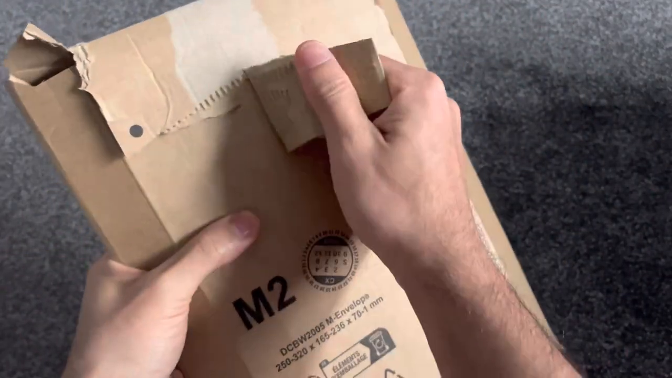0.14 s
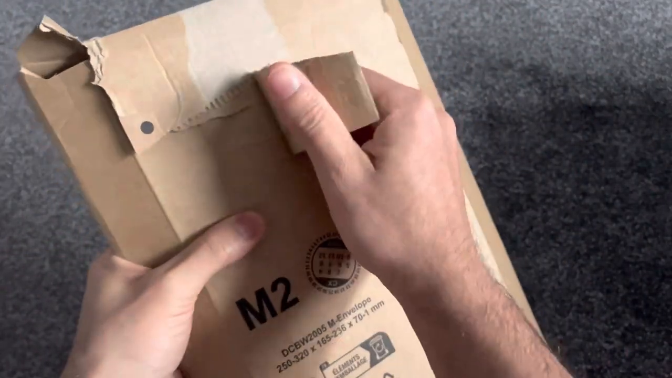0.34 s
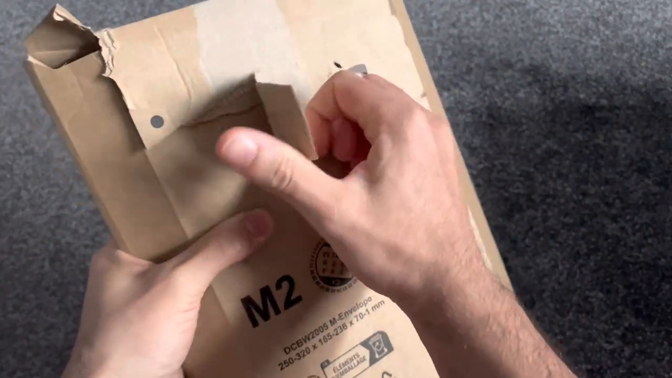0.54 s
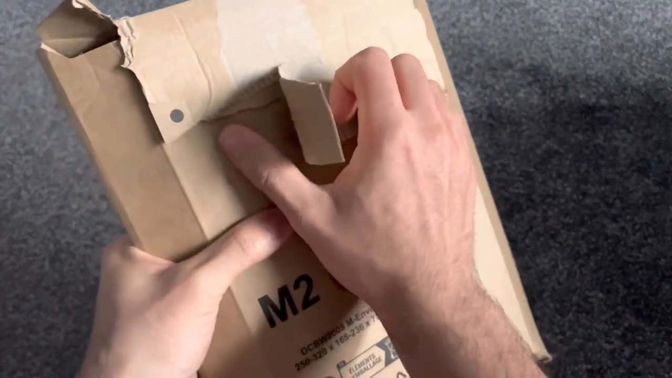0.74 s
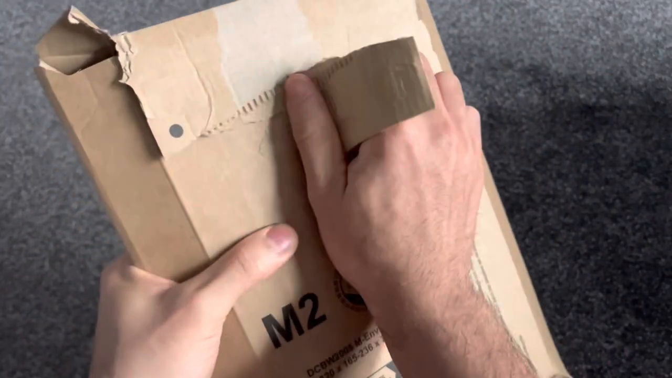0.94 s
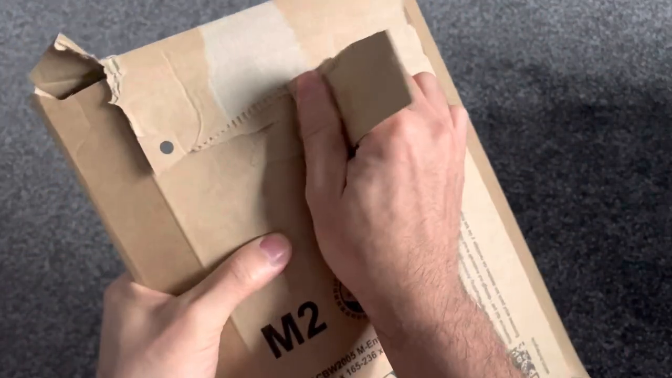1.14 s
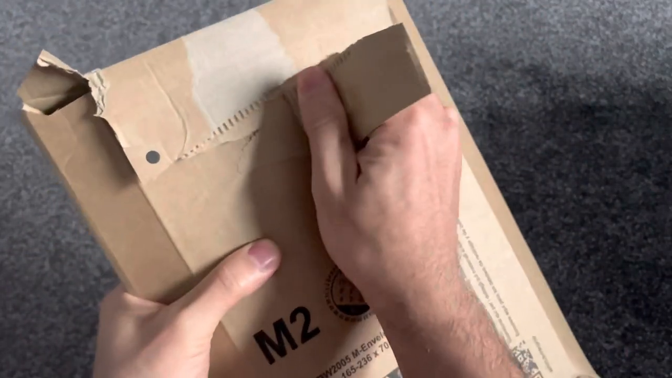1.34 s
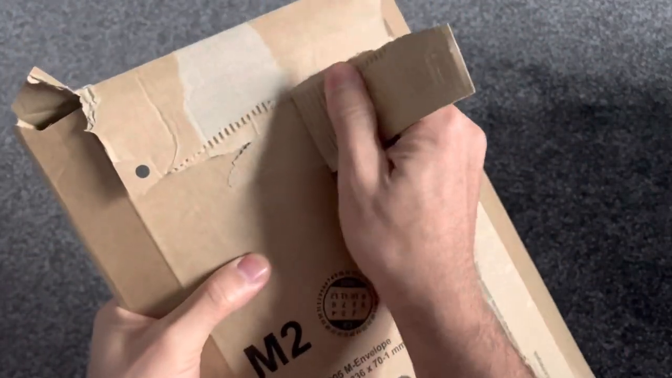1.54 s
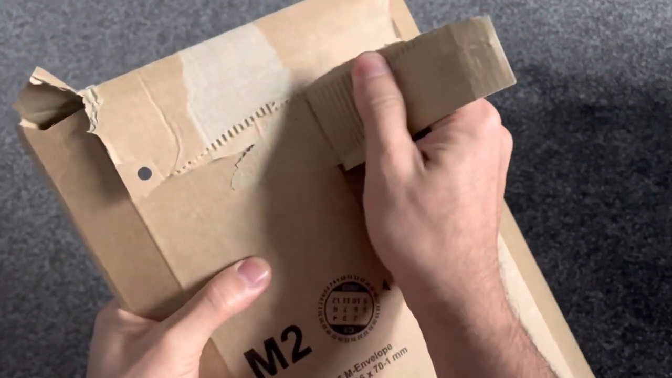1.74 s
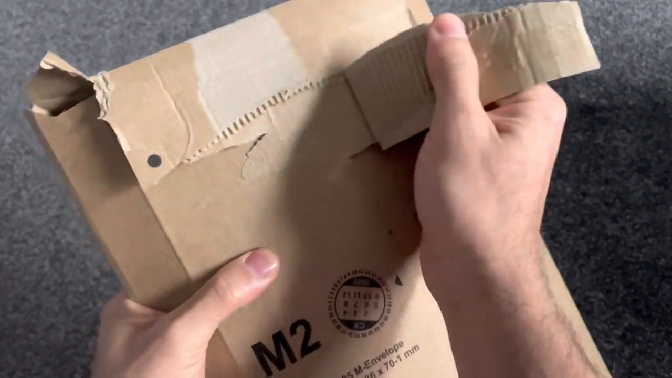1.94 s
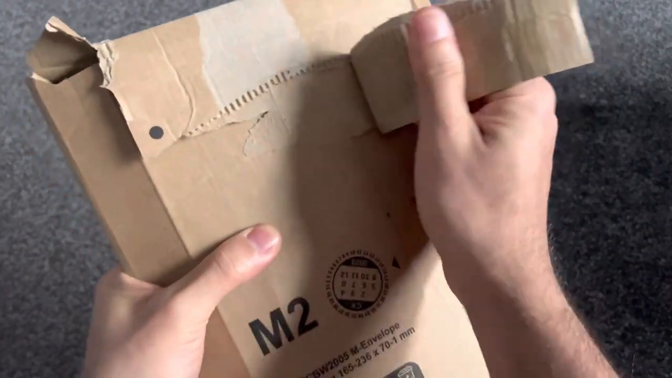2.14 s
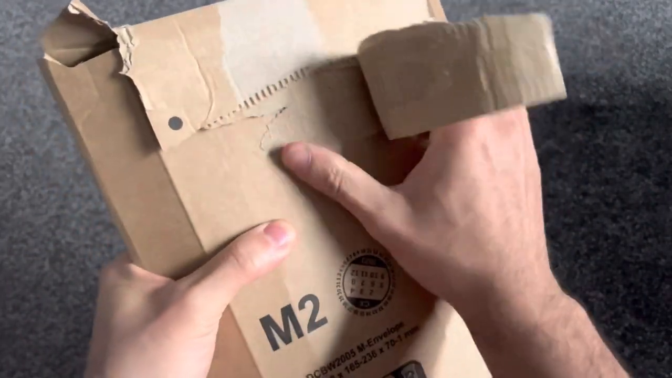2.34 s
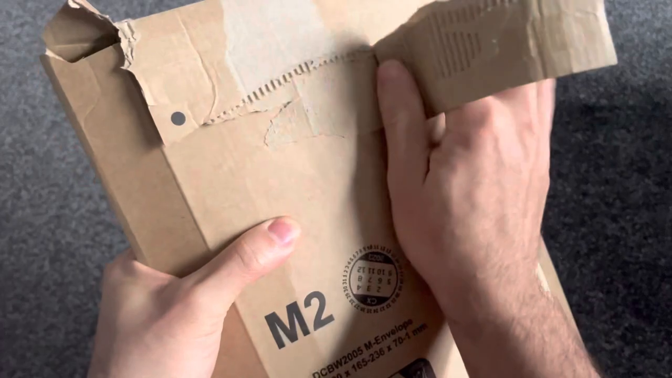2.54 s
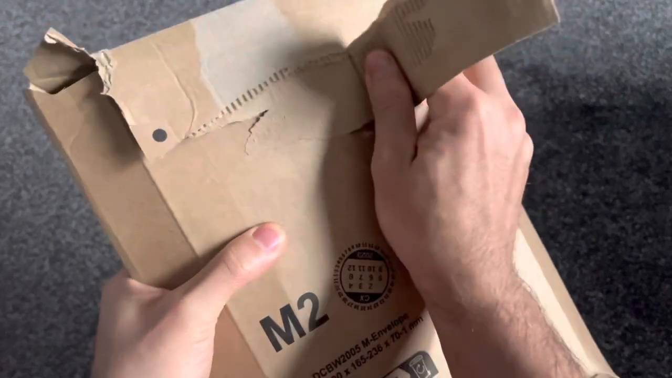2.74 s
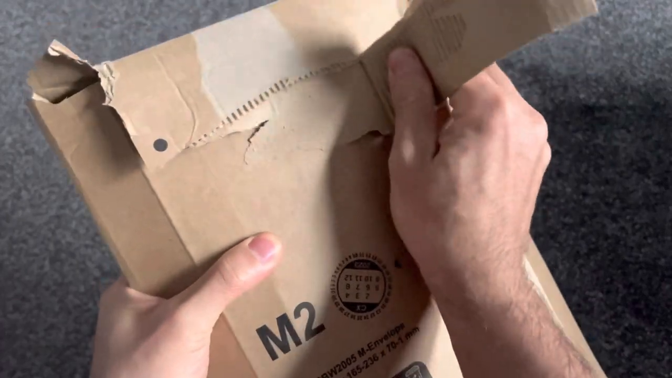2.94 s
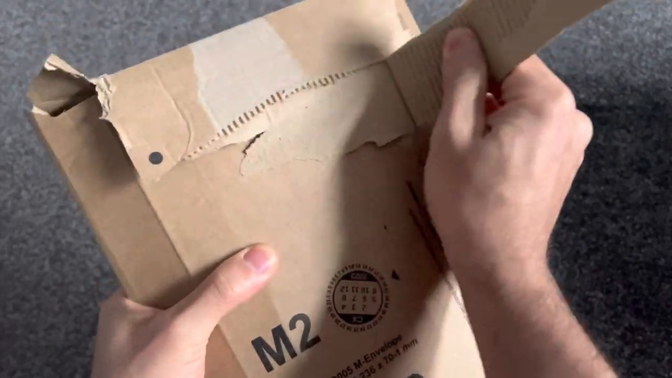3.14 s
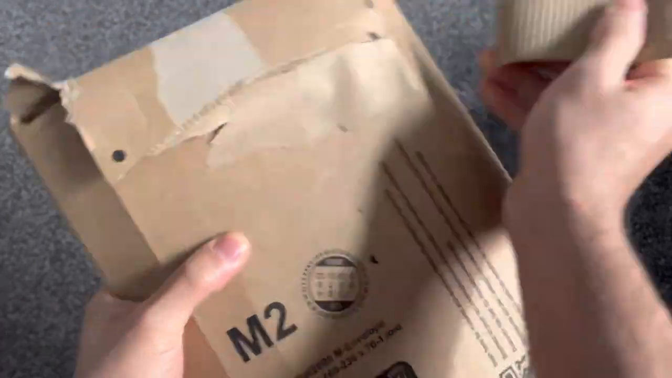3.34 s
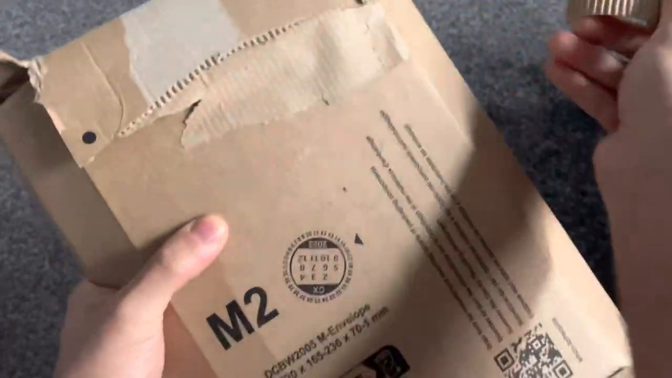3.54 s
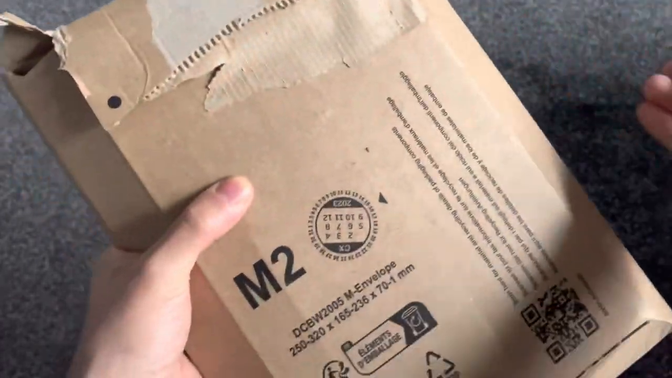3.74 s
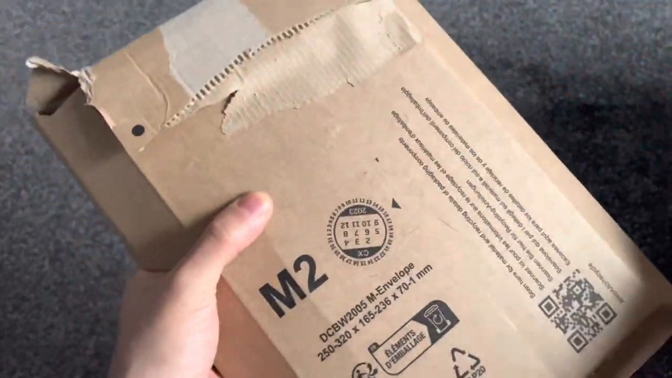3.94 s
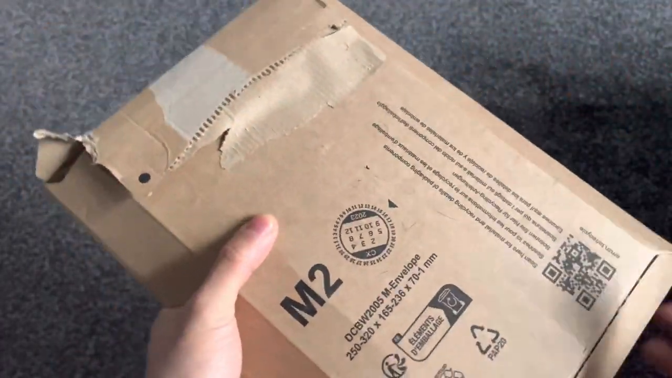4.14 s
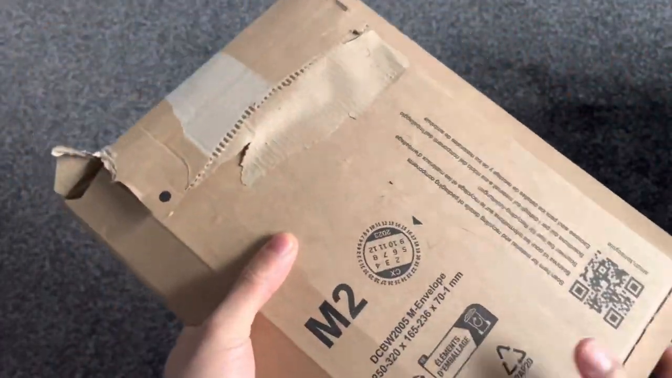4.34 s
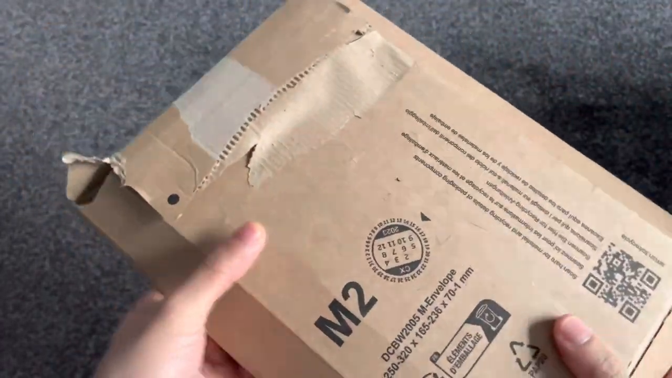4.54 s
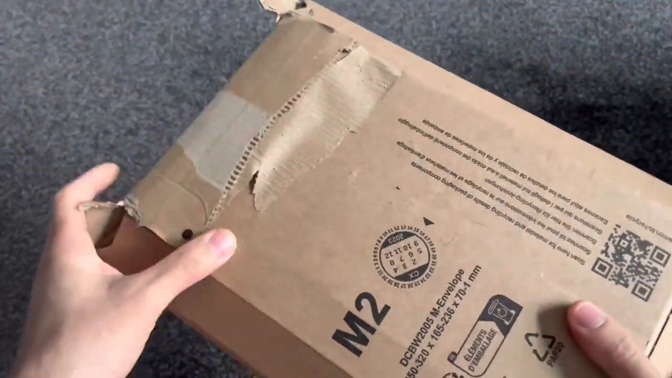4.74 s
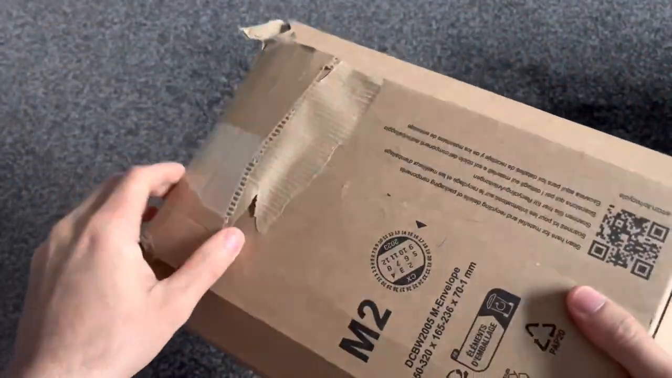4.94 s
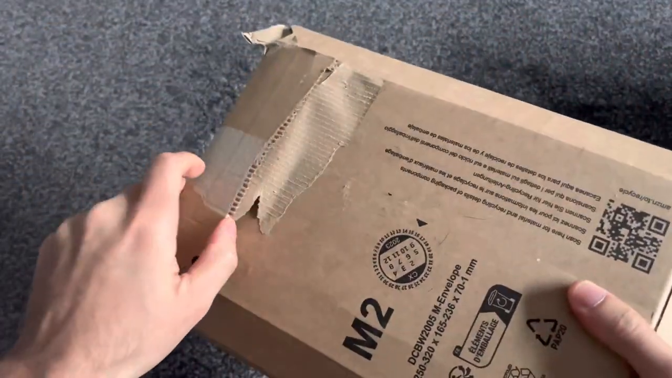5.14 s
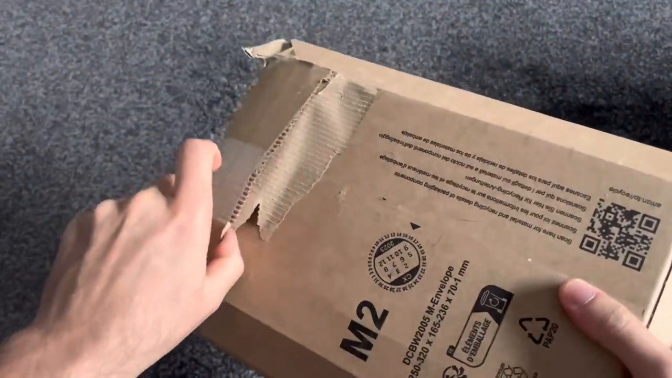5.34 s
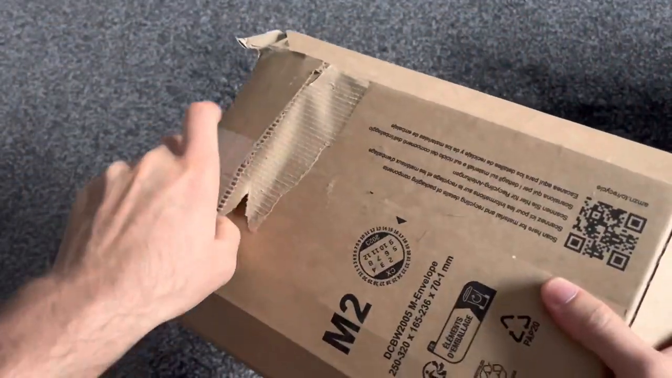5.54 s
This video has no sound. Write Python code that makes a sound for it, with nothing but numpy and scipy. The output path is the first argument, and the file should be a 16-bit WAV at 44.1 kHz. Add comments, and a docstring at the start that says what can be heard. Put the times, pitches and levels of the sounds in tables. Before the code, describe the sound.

Hands rip open a corrugated cardboard envelope close by, with sharp snaps and hollow thumps, then handle it softly.

```python
"""Tearing open a cardboard mailer

A hand tears the strip off a corrugated mailer close below a phone, in a carpeted room. Glued flutes let
go in snaps; each runs through the board as a bending wave, treble first and bass last. Fibres fizz and
fingers rub between the snaps, and the hollow mailer booms as it flexes. The two microphone ports hear
the treble with a fixed lag, over a quiet room tone."""
import sys
import numpy as np
from scipy import signal
from scipy.fft import rfft, irfft, next_fast_len
from scipy.io import wavfile
from scipy.ndimage import uniform_filter1d, map_coordinates

SR = 44100
rng = np.random.default_rng(int(sys.argv[2]) if len(sys.argv) > 2 else 0)


def to_wav(s):
    """Save 16-bit WAV."""
    ch = np.atleast_2d(s).T  # columns
    pcm = np.round(np.clip(ch, -1, 1) * 32767)  # PCM
    wavfile.write(sys.argv[1], SR, pcm.astype(np.int16))


N = 246519

# Glue and flutes letting go. Each row: start in seconds, crack level in dB, then board and torn edge
# in dB over the crack. Each layer adds its own trim.
SNAPS = [(.0032, -36.5, 6.5, 18), (.1262, -53, -4.5, 12), (.3, -52, -9, 2.5), (0.333, -38.5, -3.5, -1),
         (.3495, -37.5, -8, 2), (0.4543, -38.5, -14, 0), (0.4779, -33, 3.5, 8.5), (0.4898, -22.5, 4, 4),
         (0.7167, -49.5, 9, -20), (0.9773, -37.5, -4.5, 7.5), (0.9903, -18.5, -26, -7),
         (0.998, -23, -29, 1), (1.006, -24, -18.5, -5), (1.042, -17.5, -18.5, -5), (1.053, -23, -6, -1),
         (1.1353, -28.5, -10, 5), (1.1488, -15, -3.5, 5), (1.153, -10.5, -9.5, -2), (1.158, -18, -6.5, -4),
         (1.164, -10.5, -7.5, -10.5), (1.168, -30, -12, 2), (1.2401, -18, -3, 7), (1.2431, -11, -0.5, 1.5),
         (1.2509, -10, -6.5, -4.5), (1.2605, -9, -7.5, -20.5), (1.333, -23, -9, 4), (1.3605, -15, -7, -9.5),
         (1.3735, -26.5, -1, -0.5), (1.3868, -20.5, -3.5, -3.5), (1.4012, -12.5, -11, -10),
         (1.405, -19, 3, -11.5), (1.419, -22, -3.5, 2.5), (1.461, -37, -6, 10), (1.49, -28.5, -5, 12),
         (1.4961, -11.5, 4.5, 4), (1.5062, -17, 5.5, -18.5), (1.512, -29.5, 10, -11.5),
         (1.532, -10, -3, -0.5), (1.545, -20, -10.5, -9), (1.55, -9.5, -0.5, -6), (1.652, -9, -3.5, -1.5),
         (1.6659, -11, 2.5, -3.5), (1.6842, -17.5, -13, -7.5), (1.708, -3.5, -9, -20),
         (1.7153, -15.5, -2, -15.5), (1.7215, -17.5, -9, -9), (1.8225, -8, 0, -4), (1.85, -17, 11.5, 10),
         (1.853, -1.5, -15, -10.5), (1.8743, -6, -1.5, -4.5), (1.8933, -2.5, -10, -12),
         (2.001, -5.5, -7, -4.5), (2.0042, -2, -9.5, -12), (2.1508, -19.5, -0.5, -10.5),
         (2.2774, -22.5, -12, -11.5), (2.347, -30.5, -2.5, -11.5), (2.481, -38.5, 10.5, -14.5),
         (2.4873, -32.5, -2.5, -23), (2.4919, -32.5, 5, -23), (2.5722, -29.5, -5, -19.5),
         (2.58, -37, 2.5, -11.5), (2.7787, -29, -13.5, -1.5), (2.7875, -5.5, -13, 1.5),
         (2.9145, -24, -10.5, -0.5), (2.918, -25.5, -8, 6.5), (2.9231, -11, -4, 1.5),
         (2.939, -28.5, 7, -18.5), (3.0218, -4.5, -3.5, -3.5), (3.035, -24, -11.5, -15),
         (3.043, -4.5, -4.5, -11.5), (3.05, -6.5, 0.5, -8.5), (3.085, -8.5, -0.5, -3.5),
         (3.141, -9.5, 3, -3), (3.1925, -6.5, -0.5, -6), (3.2613, -13, 9, 0.5), (3.2744, -10, -1.5, 1),
         (3.2899, -16, 7, 2.5), (3.3042, -14, 3, -3.5), (3.311, -17, 8, -4.5), (3.3151, -20, -4, -6),
         (4.2925, -41.5, -8.5, -11), (4.495, -45.5, 1, -4), (4.587, -44.5, 2.5, -11),
         (4.8635, -27.5, -18.5, -28), (4.8776, -43, -10, -16), (5.0942, -45, 8.5, 9),
         (5.1078, -34.5, -1, 10), (5.1155, -24, -8, -26.5), (5.128, -29, -25, -5), (5.313, -48, 12.5, -12),
         (5.5437, -40, 5, 0), (5.5616, -28.5, -2, -4.5)]
# The board's modes move and damp as the grip changes and the strip comes away.
# Each row: time in seconds, pitch factor, damping factor.
BOARD_GRIP = [(0, 1.17, .9), (.49, 0.97, 0.65), (1, 1.3, .9), (1.299, 1.115, 0.93), (2, 1.054, 1.3),
              (2.15, 1.16, 1.2), (2.41, 1.13, 0.61), (2.5, 1.09, 0.64), (2.8, 0.91, 1.4), (2.95, 1, 0.96),
              (3.02, 1.43, 1.9), (3.14, 1.66, 2.1), (3.35, 1.87, 3), (4.7, 1.33, 1.5), (4.87, 1.65, 1.75),
              (5.1, 1.31, 2.3), (5.59, 1.3, 0.87)]
# Crack pitch and tick brightness at chosen snaps; the snaps between take in-between values.
# Each row: time in seconds, pitch factor of the crack, tilt of the edge tick in dB per octave.
SNAP_COLOUR = [(0, 1.4, 0), (1, 1.35, -1.7), (1.042, 1.4, 2.5), (1.15, 1.8, -4.5), (1.25, 1.18, -6),
               (1.36, 0.89, -1), (1.4, 0.81, 3), (1.5, 1.34, -3.5), (1.65, 0.96, 7), (1.85, 1.03, 5),
               (2.005, 1.054, 5.5), (2.15, 0.68, -10), (2.5, 0.54, -0.9), (2.79, 1, -4.5),
               (3.04, 0.97, -3.5), (3.14, 0.9, -1.5), (3.3, 0.9, -0.8), (4.29, .55, 5), (4.865, 1.27, -4),
               (5.1, .95, 8.5)]
# The bright fizz of the torn edge. Each row: frequency in Hz, level in dB.
EDGE_SPECTRUM = [(4000, -11.5), (5500, -1.5), (8000, -2), (12000, -6.5), (15500, -10.5), (16000, -19.5),
                 (16600, -37), (17100, -43.5)]
# The boom of the hollow mailer when centred on THUMP_HZ. Each row: frequency in Hz, level in dB.
THUMP_SPECTRUM = [(25, -11.5), (60, 2.5), (120, 4), (250, -3), (450, -30.5)]
THUMP_HZ = 120


def amp(db):
    """Gain of a dB value."""
    return 10 ** (np.asarray(db) / 20)


def unit(x):
    """x at rms 1."""
    return x / np.sqrt(np.mean(x ** 2) + 1e-20)


def along(points, hz):
    """Read (Hz, value) points on a log frequency axis."""
    f, v = np.transpose(points)
    return np.interp(np.log(hz + 1), np.log(f + 1), v)


def shaped(points):
    """An EQ curve through (Hz, dB) points."""
    return lambda hz: amp(along(points, hz))


def at_times(s, table):
    """The columns of a table of timed values, read at times s."""
    times, *columns = np.transpose(table)
    return [np.interp(s, times, column) for column in columns]


def filtered(x, response, pad=8192):
    """x through a complex frequency response."""
    n = x.shape[-1]
    m = next_fast_len(n + pad, real=True)
    return irfft(rfft(x, m) * response(np.fft.rfftfreq(m, 1 / SR)), m)[..., :n]


def wobble(rate):
    """A smooth random curve, rate knots a second."""
    return map_coordinates(rng.standard_normal(int(N * rate / SR) + 4), [np.arange(N) * rate / SR])


def resonance(hz, centre, width):
    """One causal resonant peak."""
    return 1j * hz * width / (centre ** 2 - hz ** 2 + 1j * hz * width)


def bending(hz, lag_1k_s=.00045, slope=1.4):
    """Bending waves slow down as pitch falls: delay = lag_1k_s * (1 kHz / hz) ^ slope."""
    khz = np.clip(hz, 45, None) / 1000
    return np.exp(-2j * np.pi * 1000 * lag_1k_s * (khz ** (1 - slope) - 1) / (1 - slope))


def panel(hz, stiffen, damping):
    """The board's modes as one response; all but the lowest follow the stiffness."""
    # Panel modes before the grip shifts them. Each row: centre in Hz, width in Hz, level in dB.
    modes = [(322.7, 76, 4.5), (695.4, 198, 8), (1350, 390, -2.5)]
    response = 0
    for k, (centre, width, db) in enumerate(modes):
        shift = stiffen if k else 1
        response += (-1) ** k * amp(db) * resonance(hz, centre * shift, width * damping * shift)
    return response


def bursts(s, peak_db, t60_s, colour, kick, fray_db, size, fray_s=.021, rise_s=.00058):
    """A kick and a dying noise burst per event, trailed by fraying fibres and smeared by the board."""
    lead = 256  # samples of pre-roll
    t = np.clip(np.arange(size) - lead, 0, None) / SR
    noise = rng.standard_normal((len(peak_db), 2, size))
    breaks = uniform_filter1d((noise[:, 1] > 2.6) * 24., size=24)  # sparse half-millisecond pulses
    fibres = 2.25 * breaks * amp(fray_db - 60 * t / fray_s)
    envelope = (1 - np.exp(-t / rise_s)) * (amp(-60 * t / t60_s) + fibres)
    force = noise[:, 0] * envelope
    force[:, lead + 16] += kick  # the bond lets go at once
    hits = filtered(force, lambda hz: colour(hz) * bending(hz), pad=0)
    hits *= (amp(peak_db) / np.abs(hits).max(axis=1))[:, None]
    at = np.round(s * SR).astype(int)[:, None] + np.arange(size)
    return np.bincount(at.ravel(), hits.ravel(), N + 2 * size)[lead:lead + N]


def snaps():
    """Each snap cracks the liner, rings the board, ticks at the torn edge and thumps the mailer."""
    # The liner's crack at pitch factor 1. Each row: frequency in Hz, level in dB.
    crack_spectrum = [(700, -37), (1400, -4), (2200, -6), (2700, 3), (3500, 1), (4700, -8), (6500, -25.5)]
    s, db, board_db, _ = np.transpose(SNAPS)
    pitch, _ = at_times(s[:, None], SNAP_COLOUR)
    stiffen, damping = at_times(s[:, None], BOARD_GRIP)
    stiffen *= np.exp(.04 * rng.standard_normal(stiffen.shape))  # each snap rings from another spot
    crack = bursts(s, db - 2, t60_s=.00588, colour=lambda hz: amp(along(crack_spectrum, hz / pitch)),
                   kick=2.3, fray_db=-8.5, size=2048)
    board = bursts(s, db + board_db + .27, t60_s=.00756, colour=lambda hz: panel(hz, stiffen, damping),
                   kick=12, fray_db=-10, size=4096)
    tick = torn_edge(kick=.71)
    thump = thumps(s, db + board_db - 20.5, THUMP_HZ, ring_db=-9.5)
    return crack + tick + board + thump


def torn_edge(kick):
    """The torn edge ticks with every snap, brighter or duller from snap to snap."""
    s, db, _, edge_db = np.transpose(SNAPS)
    _, tilt = at_times(s[:, None], SNAP_COLOUR)
    colour = lambda hz: amp(along(EDGE_SPECTRUM, hz) + tilt * np.log2(np.clip(hz, 4000, None) / 8000))
    return bursts(s, db + edge_db + 1.5, t60_s=.00392, colour=colour, kick=kick, fray_db=-17, size=2048)


def thumps(s, peak_db, centre_hz, ring_db, hollow_q=7.3):
    """The hollow mailer booms briefly and rings at centre_hz."""
    centre = np.reshape(centre_hz, (-1, 1))
    ring = amp(np.reshape(ring_db, (-1, 1)))

    def boom(hz):
        body = amp(along(THUMP_SPECTRUM, hz * THUMP_HZ / centre))
        return body * (1 + ring * resonance(hz, centre, centre / hollow_q))
    return bursts(s, peak_db, t60_s=.0047, colour=boom, kick=60, fray_db=-23, size=4096)


def drag_levels(hop=32):
    """Every drag swells and fades evenly in dB; returns the gains of liner, board and edge."""
    # Fingers and fibres dragging. Each row: peak time in seconds, liner level in dB, board and torn
    # edge in dB over the liner, seconds to swell by 20 dB, seconds to fade by 20 dB.
    drags = [(.004, -40.5, 7.5, 4.5, 0.086, 0.022), (0.039, -61, 7, -7, 0.12, 0.51),
             (0.489, -53, 7.5, 1.5, .07, 0.065), (0.791, -67, 8, -9, 0.2, 0.4),
             (0.883, -51, 12.5, 3, 0.098, 0.073), (0.984, -58, 1, 11, 0.032, 0.22),
             (1.057, -39.5, -1, 9.5, 0.019, 0.011), (1.075, -62.5, 11, 9, 0.023, 0.21),
             (1.151, -46, 7, 5.5, 0.02, 0.084), (1.247, -38.5, 0, 7, 0.017, 0.066),
             (1.378, -30.5, 3, 0.5, 0.0069, 0.061), (1.502, -35.5, 0.5, -2.5, 0.027, 0.18),
             (1.653, -42.5, 8, 5, 0.01, 0.085), (1.714, -37, 0, -7, 0.012, 0.062),
             (1.824, -38.5, 9, -17, 0.011, 0.074), (1.86, -37, 3.5, -2.5, 0.016, 0.14),
             (2.004, -43, 5, -6.5, 0.013, 0.18), (2.287, -56.5, 3.5, -14.5, 0.12, 0.1),
             (2.416, -54.5, 13, -11, 0.032, 0.051), (2.466, -53.5, 23.5, -12.5, 0.012, 0.04),
             (2.496, -41.5, 5, -11.5, 0.037, 0.04), (2.562, -60, 2.5, -16, .012, .04),
             (2.59, -58.5, 9.5, 4, .07, 0.096), (2.806, -37, 2.5, -6, 0.037, 0.097),
             (2.938, -37, 0.5, -10.5, 0.027, 0.12), (3.042, -31.5, -2.5, -9, 0.0086, 0.11),
             (3.143, -44.5, -1, -8, 0.0093, 0.063), (3.195, -46, 7, 0, 0.012, 0.064),
             (3.311, -32, 5, 7, 0.037, 0.027), (3.36, -53.5, 4.5, -2.5, 0.073, 0.25),
             (3.632, -76, 7.5, 23, 0.029, 0.0475), (3.975, -84, -7.5, 18.5, 0.0063, 0.054),
             (4.05, -80, -6, 5, .03, 0.159), (4.264, -72.5, 6, 5.5, 0.0072, 0.38),
             (4.45, -72.5, 6, -23, 0.078, 0.31), (4.572, -57.5, -1.5, 2.5, 0.19, 0.2),
             (4.668, -57.5, 10.5, -11, 0.031, 0.037), (4.749, -61.5, 12, 1, 0.089, 0.077),
             (4.798, -55.5, 5, -19, 0.013, 0.0099), (4.834, -55, 7.5, 1, 0.011, 0.014),
             (4.88, -52.5, 7, -4.5, 0.052, 0.019), (4.95, -72, 12, -15, 0.036, 0.052),
             (5.011, -65, 0.5, -34, 0.11, 0.11), (5.116, -43, -6, -4.5, 0.039, 0.081),
             (5.316, -61.5, 7.5, -7.5, 0.11, 0.4), (5.558, -45.5, -1.5, -1, 0.028, 0.03),
             (5.587, -50, -1, -5, 0.023, 0.045)]
    s, db, board_db, edge_db, swell_s, fade_s = np.transpose(drags)
    late = np.arange(0, N + hop, hop) / SR - s[:, None]
    envelopes = amp(-20 * np.where(late < 0, -late / swell_s[:, None], late / fade_s[:, None]))
    gains = amp([db, db + board_db, db + edge_db]) @ envelopes
    return [np.interp(np.arange(N) / hop, np.arange(len(gain)), gain) for gain in gains]


def through_board(x):
    """x coloured by the board's moving modes and the mailer's hollow boom."""
    hz, t, spectra = signal.stft(x, SR, nperseg=1024)
    modes = panel(hz[:, None], *at_times(t, BOARD_GRIP))
    boom = amp(along(THUMP_SPECTRUM, hz) - 2)[:, None]
    return signal.istft(spectra * (modes + boom), SR, nperseg=1024)[1][:N]


def rubbing(grains_per_s=800, spread_db=4, grain_db=-5):
    """Skin and fibres slip in tiny uneven grains over a hiss; the heavy board follows the hiss alone."""
    # Skin on the liner. Each row: frequency in Hz, level in dB.
    skin_spectrum = [(700, -26), (1400, -8), (1950, 0), (2500, 2), (4500, -3), (6500, -16)]
    liner_gain, board_gain, edge_gain = drag_levels()
    slips = (rng.random(N) < grains_per_s / SR) * amp(spread_db * np.clip(rng.standard_normal(N), -2, 2))
    grains = unit(signal.lfilter([1], [1, -.97], slips))
    hold = amp(1.5 * wobble(30) + 1.5 * wobble(90))  # the grip tightens and loosens
    hiss = hold * rng.standard_normal(N)
    friction = (1 + amp(grain_db) * grains) * hiss
    liner = unit(filtered(friction, shaped(skin_spectrum)))
    edge = unit(filtered(friction, shaped(EDGE_SPECTRUM)))
    return liner_gain * liner + board_gain * unit(through_board(hiss)) + edge_gain * edge


def room_tone():
    """The quiet of the room, mostly bass, wavering a little."""
    # The steady hush. Each row: frequency in Hz, relative level in dB.
    hush_spectrum = [(20, -18), (60, 9.5), (120, 2.5), (350, -9), (700, -40.5), (2000, -46.5), (8000, -41),
                     (14000, -44), (16000, -67.5)]
    mid, side = filtered(rng.standard_normal((2, N)), shaped(hush_spectrum))
    return amp(-70.5 + wobble(5.6)) * unit(np.array([mid + .4 * side, mid - .46 * side]))


def room_tails(count, echo_db, tail_s):
    """One echo off the nearest wall, then frequencies that die at their own speeds."""
    # The room's decay. Each row: frequency in Hz, seconds to fall by 60 dB.
    decay_times = [(100, 0.68), (205, 0.34), (350, 0.54), (700, 0.34), (3000, 0.42), (12000, 0.41)]
    # What carpet and walls send back. Each row: frequency in Hz, gain in dB.
    wall_return = [(60, 11.5), (300, 11.5), (1000, 7), (2000, -5), (4500, -1), (7000, -32), (14000, -36.5)]
    hz, t, spectra = signal.stft(rng.standard_normal((count, round(tail_s * SR))), SR, nperseg=256)
    decay = amp(-60 * t / along(decay_times, hz)[:, None])
    tails = signal.istft(spectra * decay, SR, nperseg=256)[1]
    tails /= np.linalg.norm(tails, axis=1)[:, None]
    tails[:, :48] *= amp(echo_db)  # the first millisecond stands out as the echo
    return filtered(tails, shaped(wall_return), pad=0)


def reflections(x, delay_s, echo_db, fresh_s, tail_s):
    """The room answers x with a new tail every fresh_s."""
    size, delay = round(fresh_s * SR), round(delay_s * SR)
    pieces = np.pad(x, (0, -N % size)).reshape(-1, size)
    answers = signal.fftconvolve(pieces, room_tails(len(pieces), echo_db, tail_s), axes=1)
    at = delay + size * np.arange(len(pieces))[:, None] + np.arange(answers.shape[1])
    return np.bincount(at.ravel(), answers.ravel())[:N]


def standing_wave(x, centre_hz=203, width_hz=4, gain_db=2):
    """One low mode of the room hums on after x."""
    return filtered(x, lambda hz: amp(gain_db) * resonance(hz, centre_hz, width_hz), pad=SR)


def flexes():
    """The whole mailer booms as it flexes or is bumped, higher for a small bump."""
    # Each row: start in seconds, peak level in dB, centre in Hz, strength of the ring in dB.
    bumps = [(0.3494, -42, 195, -8), (0.491, -22, 316, 13), (1.157, -33, 191, -5), (1.6546, -33.5, 162, -2),
             (1.8211, -27.5, 153, 3), (1.849, -18, 209, -4.5), (2.004, -23.5, 148, -9),
             (2.2779, -38, 142, -16), (2.532, -45.5, 255, 13), (2.5746, -32.5, 109, -5.5),
             (2.773, -33.5, 203, -6.5), (2.787, -17.5, 90, 0), (2.928, -17, 104, 3.5),
             (3.043, -19.5, 112.4, -2), (3.2756, -22.5, 131, 8), (3.375, -25, 283, -7),
             (3.976, -54.5, 222, 1.5), (4.295, -48, 115.6, 3.5), (4.661, -47, 334, 8), (4.712, -45, 294, 3),
             (4.738, -45.5, 242, 9), (4.8335, -44.5, 296, 10.5), (4.848, -41.5, 337, 14),
             (4.885, -41.5, 291, 17)]
    return thumps(*np.transpose(bumps))


def ports(shared, apart):
    """Two microphone ports: one sound, offset in phase and level, plus a part that each hears alone."""
    # Phase between the ports. Each row: frequency in Hz, lead of the left port in radians.
    left_lead = [(0, 0), (520, -.7), (1030, 0), (1800, .3), (2760, 2), (3400, 1.2), (4500, 1.3), (5600, 3),
                 (15500, 16.6)]
    # Balance of the ports. Each row: frequency in Hz, left minus right in dB.
    balance = [(60, -1), (210, -2.5), (500, -3), (1170, -3), (1790, 1), (2740, -2.5), (4600, -10),
               (6400, 0.5), (15000, -1.5)]
    # Room sound that differs between the ports. Each row: frequency in Hz, share as a gain.
    diffuse_share = [(100, .015), (300, .02), (600, .1), (1300, .07), (3000, .35), (4500, .4), (6000, .6),
                     (15000, .9)]
    side = np.array([[.5], [-.5]])

    def placement(hz):
        phase = np.interp(hz, *np.transpose(left_lead))
        return amp(side * along(balance, hz)) * np.exp(1j * side * phase)
    return filtered(shared, placement) + filtered(apart, lambda hz: along(diffuse_share, hz))


def scene():
    """Mailer, room and room tone at two ports; each catches its own reflections and edge scatter."""
    mailer = snaps() + flexes() + rubbing()
    near = np.array([reflections(mailer, delay_s=.0005, echo_db=db, fresh_s=.035, tail_s=.2)
                     for db in (21, 20.5)])
    scatter = np.array([torn_edge(kick=0), torn_edge(kick=0)])
    far = reflections(mailer, delay_s=.0135, echo_db=20, fresh_s=1 / 9, tail_s=.5)
    shared = mailer + amp(-27) * far + standing_wave(mailer)
    apart = amp(2) * near + amp(-5) * scatter
    return ports(shared, apart) + room_tone()


def record(dry):
    """The phone rounds off the loudest peaks and keeps nothing above its band limit."""
    ceiling, top_hz = .95, 17100
    soft = dry / (1 + np.abs(dry / ceiling) ** 3) ** (1 / 3)
    return filtered(soft, lambda hz: hz < top_hz)


dry = scene()
out = record(dry)
to_wav(out)
```